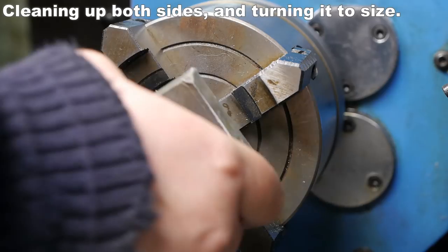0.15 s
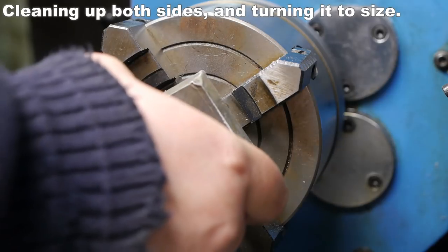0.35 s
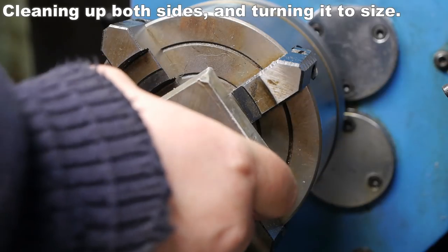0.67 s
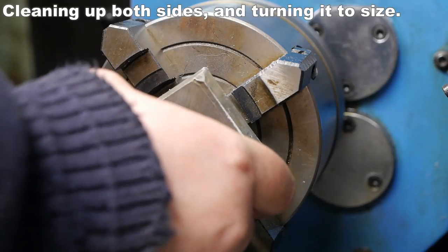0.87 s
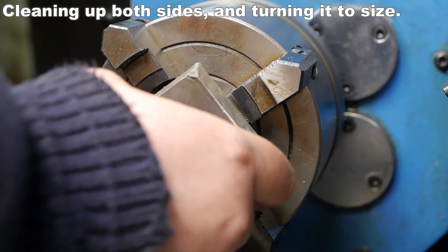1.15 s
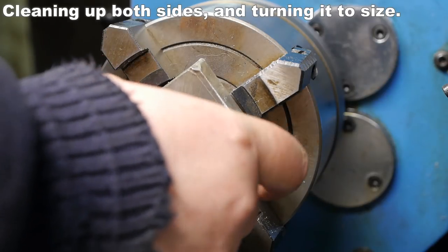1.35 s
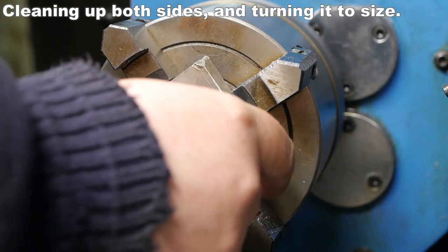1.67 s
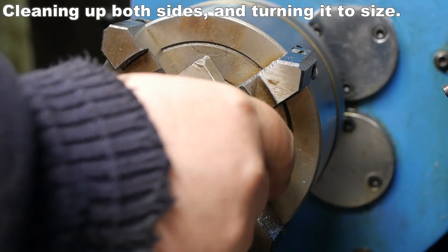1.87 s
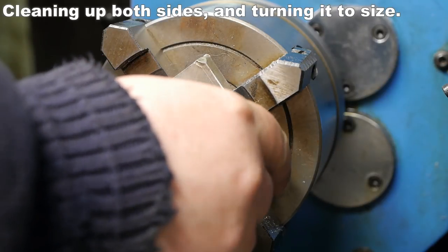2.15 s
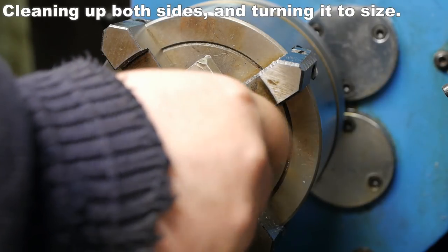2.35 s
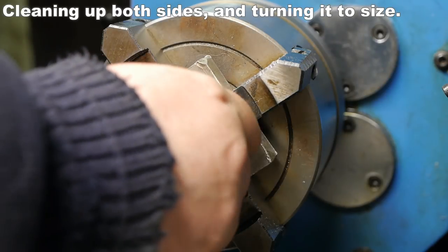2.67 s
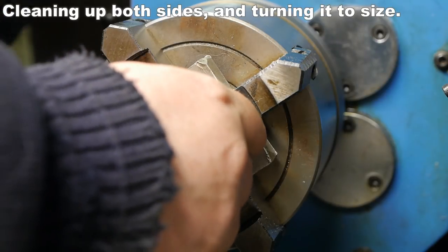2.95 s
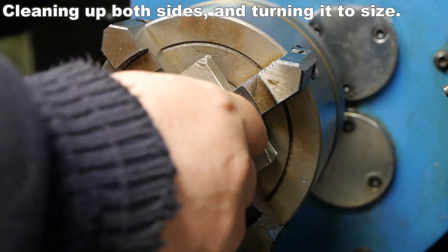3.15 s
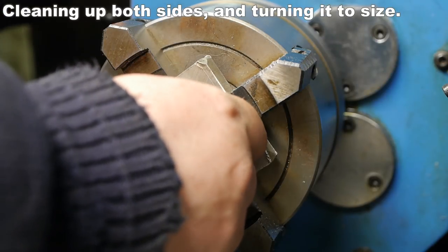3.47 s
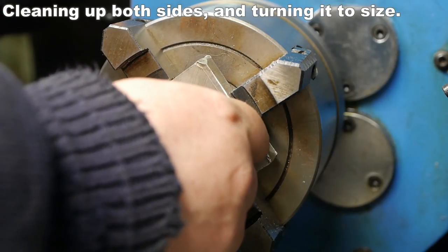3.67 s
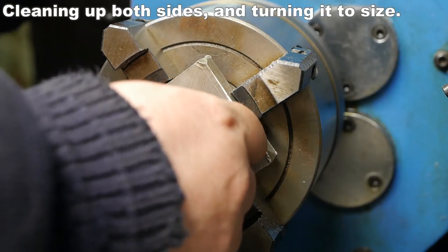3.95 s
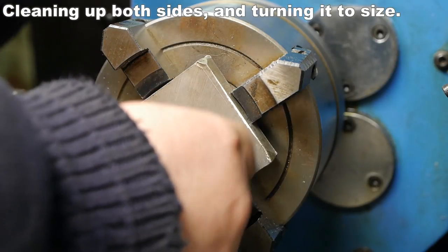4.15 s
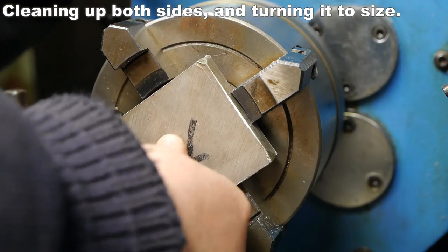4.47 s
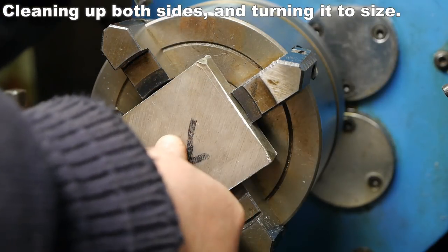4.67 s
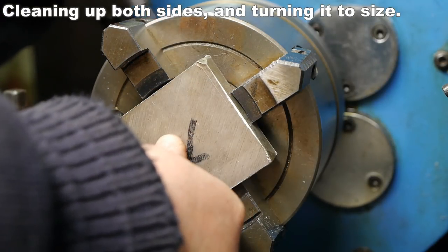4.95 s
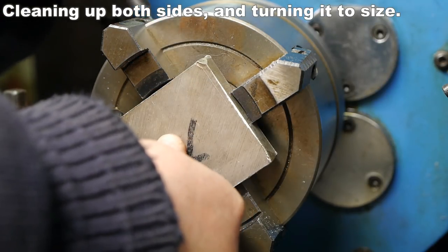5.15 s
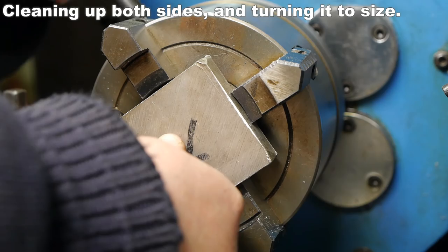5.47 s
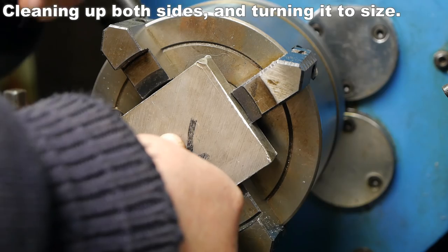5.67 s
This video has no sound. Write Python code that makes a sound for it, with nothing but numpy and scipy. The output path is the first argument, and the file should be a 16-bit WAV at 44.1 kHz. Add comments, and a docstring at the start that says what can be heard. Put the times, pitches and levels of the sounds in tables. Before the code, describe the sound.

In a quiet workshop, a metal block is fitted into a lathe chuck with dull booming knocks, short scrapes, small clinks and sharp final clacks.

```python
"""In a small, quiet workshop a hand seats a square aluminium block in the jaws of a lathe chuck.
Each knock on the steel jaws cracks (shaped noise), rings the block, then booms through chuck and bed
(decaying modes); loose parts rattle on. Sliding faces hiss, scrape and grind as dense random grains.
A steel key and the block clink briefly as a bank of high modes. Diffuse reflections answer the work,
and a low room rumble with faint hiss and mains hum lies below as banded noise and a sine."""
import sys
import numpy as np
from scipy import signal
from scipy.fft import rfft, irfft
from scipy.io import wavfile

SR = 44100
rng = np.random.default_rng(int(sys.argv[2]) if len(sys.argv) > 2 else 0)


def wav_out(sig):
    """Save sig, one row per channel (or a flat mono array), as 16-bit PCM at SR to the path in sys.argv[1]."""
    wavfile.write(sys.argv[1], SR, np.round(np.clip(np.atleast_2d(sig).T, -1, 1) * 32767).astype(np.int16))


N = 256662  # length [samples]

KNOCK_T = np.arange(int(.36 * SR)) / SR  # time from the start of a knock [s]
IMPULSE = KNOCK_T == 0
BED_LAG_S = 0.0066
SWELL = 1 - np.exp(-(KNOCK_T / BED_LAG_S) ** 3.24)  # heavy castings take a few cycles to get going


def knocks():
    """Impact excitation: an impulse for the castings, separate noise for the rattle, chatter for the block."""
    # knocks: (time [s], lathe bed [dB], chuck [dB], block [dB], contact crack [dB],
    #          favoured pitch of bed [Hz], favoured pitch of chuck [Hz])
    knock_list = [(0.265, -32.5, -61, -60, -49, 220, 695), (0.291, -47.5, -62, -53, -59, 190, 840),
                  (0.701, -40, -42, -60, -68, 470, 710), (0.936, -72, -83, -65, -72, 243, 960),
                  (1.09, -49, -52, -61, -72, 494, 890), (1.104, -49, -50, -52, -78, 570, 670),
                  (1.294, -16.5, -29, -29.5, -47, 440, 720), (1.391, -31.5, -45.5, -71, -78, 416, 750),
                  (1.501, -43, -52, -60, -66, 308, 730), (1.752, -21, -31, -47.5, -59, 453, 643),
                  (2.119, -31.5, -43, -56, -72, 510, 714), (2.143, -30, -33, -42.5, -59, 290, 664),
                  (2.17, -31, -43, -34, -58, 484, 750), (2.327, -22, -27.5, -33.5, -48, 448, 650),
                  (2.593, -79, -36.5, -51.5, -54, 408, 700), (2.838, -43.5, -42, -36.5, -30, 312, 630),
                  (3.097, -42.5, -65, -63, -74, 256, 626), (3.476, -49, -46.5, -31, -26.5, 202, 1260),
                  (3.505, -67, -41, -42, -39, 393, 1100), (3.524, -57, -69, -40.5, -48, 302, 1300),
                  (3.534, -47, -51, -36, -49, 204, 1250), (3.572, -38.5, -41.5, -30, -37.5, 498, 860),
                  (3.599, -33.5, -37, -36, -66, 490, 730), (3.742, -45.5, -59, -71, -70, 576, 820),
                  (3.83, -48, -52, -46, -28.5, 274, 750), (3.844, -47.5, -63, -44.5, -42, 510, 977),
                  (3.931, -64, -46.5, -33.5, -36.5, 507, 622), (3.936, -41.5, -45, -44, -35, 476, 1030),
                  (3.956, -44, -56, -51, -42, 467, 970), (3.978, -37.5, -37.5, -31, -39, 500, 880),
                  (4.656, -48, -80, -49, -54, 364, 716), (4.902, -53, -70, -57, -67, 353, 1120),
                  (4.931, -20, -36, -16.5, -22, 379, 690), (5.133, -19, -31.5, -24.5, -28.5, 341, 900),
                  (5.214, -38, -42, -34.5, -48, 258, 622), (5.242, -37.5, -43.5, -48, -51, 330, 880),
                  (5.377, -73, -76, -64, -50, 229, 633), (5.434, -19, -30, -26, -18.5, 383, 820),
                  (5.558, -15, -29.5, -25.5, -10, 374, 625)]
    out = np.zeros((2, N))
    for s, bed_db, chuck_db, block_db, crack_db, bed_hz, chuck_hz in knock_list:
        noises = rng.standard_normal((4, len(KNOCK_T)))
        add(out, s, castings(bed_db, chuck_db, bed_hz, chuck_hz))
        add(out, s, stand_shudder(bed_db))
        add(out, s, loose_parts(chuck_db, noises))
        add(out, s, block_on_jaws(block_db, crack_db, noises))
    return out


def castings(bed_db, chuck_db, bed_hz, chuck_hz):
    """Modal superposition: bed and chuck sum damped modes that build up with a lag after an impulse."""
    # modes of the lathe bed: (frequency [Hz], relative level [dB], t60 [s])
    bed_modes = [(182.4, -6, 0.47), (214, -6, 0.68), (240.3, -2, 0.2), (265.4, -2, 0.22), (292.9, -1, 0.27),
                 (316.2, 1.5, 0.12), (340, -7.5, 0.34), (379.9, -8.5, 0.39), (398.7, -1, 0.13),
                 (450, 3, 0.15), (479.5, 0.5, 0.13), (511.5, -4.5, 0.17), (520, 1.5, 0.17),
                 (585, -10.5, 0.29)]
    # modes of the chuck: (frequency [Hz], relative level [dB], t60 [s])
    chuck_modes = [(627, 2.5, 0.044), (711, -2, 0.095), (775, -2, 0.14), (840, -34.5, 0.36),
                   (844, -11, 0.17), (893, -6, 0.22), (1015, 1, 0.11), (1100, -14, 0.44), (1205, 7.5, 0.13),
                   (1360, 6, 0.1)]
    bed_span_oct, chuck_span_oct = 0.66, 0.49
    chuck_lag_s = 0.0032
    # the first swings of the bed stand out until the vibration has spread through it
    punch, punch_s = 0.61, 0.0047
    bed = ringing(bed_modes, IMPULSE, favour(bed_modes, bed_hz, bed_span_oct))
    bed = peak_one(SWELL * (1 + punch * np.exp(-KNOCK_T / punch_s)) * bed)
    chuck = ringing(chuck_modes, IMPULSE, favour(chuck_modes, chuck_hz, chuck_span_oct))
    chuck = peak_one((1 - np.exp(-KNOCK_T / chuck_lag_s)) * chuck)
    rumble_cut = signal.butter(4, 130, "high", fs=SR, output="sos")
    return signal.sosfilt(rumble_cut, from_db(bed_db) * bed + from_db(chuck_db) * chuck)


def stand_shudder(bed_db):
    """Low-order modes: the stand shudders below the bed with the same gradual onset."""
    # modes of the stand: (frequency [Hz], relative level [dB], t60 [s])
    stand_modes = [(70, -17, 0.38), (102.7, 5.5, 0.15), (153.5, 5.5, 0.23)]
    stand_db = -21  # against the bed
    return from_db(bed_db + stand_db) * SWELL * ringing(stand_modes, IMPULSE, count=1)


def loose_parts(chuck_db, noises):
    """Noise with exponential decay: loose parts rattle on after a knock."""
    # spectrum of the rattle: (frequency [Hz], relative level per Hz [dB])
    rattle_spectrum = [(600, 3.5), (1000, 14), (1500, -1), (2200, -33), (3500, -28), (6000, -43)]
    rattle_db, rattle_s = -5.5, 0.032  # level against the chuck, decay time
    _, left, right, loose = noises
    rattle = colour(loose + np.array([left, right]), rattle_spectrum)
    return from_db(chuck_db + rattle_db) * peak_one(SWELL * np.exp(-KNOCK_T / rattle_s) * rattle)


def block_on_jaws(block_db, crack_db, noises):
    """Contact force as source: a brief noisy chatter is heard directly and drives block and jaw modes."""
    # modes of the block: (frequency [Hz], relative level [dB], t60 [s])
    block_modes = [(1900, 0, .03), (2200, 0, .035), (2520, -2, .03), (3000, -4, .03), (3400, 0, .04),
                   (3650, -4, .03), (4400, -5, .03), (4850, -5, .03)]
    # modes of the jaws: (frequency [Hz], relative level [dB], t60 [s])
    jaw_modes = [(6150, -2, .05), (7350, 0, .07), (10200, -8, .03), (11500, -8, .03)]
    # spectrum of the block's clack and clatter: (frequency [Hz], relative level per Hz [dB])
    clack_spectrum = [(700, -3), (1300, -2), (2000, 10.5), (3000, 1.5), (4500, -8), (7000, -25)]
    # spectrum of the contact crack: (frequency [Hz], relative level per Hz [dB])
    crack_spectrum = [(2500, -16), (4500, -9.5), (6000, -2.5), (8000, -2), (9500, -7), (12000, -13.5),
                      (13500, -38), (16000, -33)]
    contact_s, pan_db = 0.004, -1.9  # decay time of the chatter; left minus right
    clatter_db, clatter_s = -9, 0.011  # level against the clack, decay time
    ring_at_40_db, ring_damping = -5.5, 0.36  # ring at a -40 dB contact; dB lost per dB of a firmer one

    shared, left, right, loose = noises
    touch = np.exp(-KNOCK_T / contact_s) * (1 - np.exp(-3 * KNOCK_T / contact_s))
    force = shared * touch
    clack = peak_one(touch * colour(shared + 0.42 * np.array([left, right]), clack_spectrum))
    crack = peak_one(touch * colour(shared + 0.73 * np.array([left, right]), crack_spectrum))
    clatter = colour(2.4 * loose + np.array([right, left]), clack_spectrum)
    clatter = peak_one(SWELL * np.exp(-KNOCK_T / clatter_s) * clatter)

    ring_gain = from_db(ring_at_40_db - ring_damping * (max(block_db, crack_db) + 40))
    block_ring = ring_gain * ringing(block_modes, force)
    jaw_ring = ring_gain * ringing(jaw_modes, force, cluster=0.0275)
    block = from_db(block_db) * (clack + from_db(clatter_db) * clatter + block_ring)
    jaws = from_db(crack_db) * (crack + jaw_ring)
    return (block + jaws) * from_db(pan_db / 2 * np.array([[1], [-1]]))


def clinks():
    """Free vibration: an impulse sets off the high ringing of key and block, each mode decaying alone."""
    # clinks of key and block: (time [s], peak level before panning [dB], favoured pitch [Hz])
    clink_list = [(3.479, -31, 8000), (3.507, -41, 1600), (3.524, -32.5, 2400)]
    # high ringing of key and block: (frequency [Hz], relative level [dB], t60 [s])
    clink_modes = [(1410, 5, .09), (2120, -2, .06), (2510, 4, 0.079), (3590, 1.5, .08), (4430, 0, 0.082),
                   (5840, -5, .1), (6760, 1.5, 0.17), (10050, -2, 0.3), (10940, -21, .1), (13240, -11, .14),
                   (14270, -18, .15)]
    span_oct = 1.55
    out = np.zeros((2, N))
    for s, db, hz in clink_list:
        weights_db = favour(clink_modes, hz, span_oct)
        clink = ringing(clink_modes, IMPULSE, weights_db, cluster=.002, spread_db=1.5, count=1)
        add(out, s, from_db(db) * clink * from_db([[-2], [2]]))  # to the right
    return out


def rubs(grains_per_s=9000, size_db=2.0):
    """Friction noise: dense uneven micro-contacts of sliding faces, heard in air, block and bed."""
    # rubbing strokes: (time at full pressure [s], hold [s], hiss [dB], scrape in the block [dB],
    #                   whisper of light rubbing [dB])
    strokes = [(0.175, 0.012, -61, -65, -71), (0.304, .14, -44, -44.5, -73),
               (1.856, 0.018, -63.5, -84, -70.5), (1.98, .06, -63.5, -67, -73), (2.2, 0.44, -77, -73, -73),
               (2.684, 0.083, -63, -60.5, -78), (2.867, 0.0079, -54.5, -55.5, -63),
               (3.242, 0.006, -55, -54.5, -59), (3.356, 0.16, -67, -72, -74),
               (3.579, 0.019, -64, -53.5, -72), (4.263, 0.023, -58.5, -72, -77),
               (4.328, 0.039, -58, -66.5, -68), (4.457, 0.026, -56.5, -64.5, -67),
               (4.58, .02, -57, -60.5, -60), (4.743, 0.0084, -64.5, -66, -64.5),
               (4.814, 0.068, -90, -90, -74), (5.194, 0.026, -65, -58.5, -73),
               (5.435, 0.003, -57, -52, -72), (5.69, .04, -61.5, -70, -87)]
    # low grind in the bed while the hand works the block: (time [s], level [dB])
    grind_level = [(0, -57.5), (.245, -56), (.27, -46.5), (.44, -47), (.55, -70), (1.45, -74),
                   (1.68, -50.5), (1.9, -76), (2.2, -64.5), (2.7, -53.5), (2.86, -58), (2.95, -61.5),
                   (3.14, -54), (3.45, -63), (4.2, -69), (4.35, -58.5), (4.9, -58), (5.4, -66.5),
                   (5.43, -39.5), (5.6, -57), (5.82, -76)]
    # spectrum of the hiss: (frequency [Hz], relative level per Hz [dB])
    hiss_spectrum = [(1760, -47), (3000, -15.5), (4730, -9.5), (8110, -9.5), (9070, -6.5), (10600, -12),
                     (14700, -25.5), (16000, -41)]
    # spectrum of the scrape: (frequency [Hz], relative level per Hz [dB])
    scrape_spectrum = [(800, -12), (1450, -13), (1560, 0), (1950, 0), (2080, -8), (3100, -5), (4500, -12),
                       (6000, -20)]
    # spectrum of the grind: (frequency [Hz], relative level per Hz [dB])
    grind_spectrum = [(90, -7), (200, 1.5), (400, 7.5), (650, -3), (1000, -12), (1500, -17)]
    # faint bands of light rubbing: (centre [Hz], width [Hz], relative level [dB])
    whisper_bands = [(3320, 210, 25), (4980, 140, -26), (5600, 210, 1), (7700, 280, -18), (10100, 680, -18)]
    rise_db_per_s, fall_db_per_s = 386, 185

    t, out = np.arange(N) / SR, np.zeros((2, N))
    stroke_gains = np.zeros((3, N))
    for s, hold, *levels_db in strokes:
        below_db = rise_db_per_s * np.maximum(s - t, 0) + fall_db_per_s * np.maximum(t - s - hold, 0)
        stroke_gains += from_db(np.array(levels_db)[:, None] - below_db)
    hiss, scrape, whisper = stroke_gains
    grind = from_db(np.interp(t, *np.transpose(grind_level)))

    # (gain, spectrum, how far left and right differ)
    layers = ((hiss, hiss_spectrum, 1.0), (scrape, scrape_spectrum, 0.71),
              (grind, grind_spectrum, 0.027), (whisper, None, 1.0))
    for gain, spectrum, apart in layers:
        struck = rng.random(N) < grains_per_s / SR
        grains = struck * from_db(size_db * rng.exponential(1, N)) * rng.choice([-1, 1], N)
        grains = rms_one(grains) + apart * rng.standard_normal((2, N))
        if spectrum:
            sound = colour(grains, spectrum)
        else:
            sound = np.zeros((2, N))
            for hz, width_hz, db in whisper_bands:
                b, a = signal.iirpeak(hz, hz / width_hz, fs=SR)
                sound += from_db(db) * signal.lfilter(b, a, grains)
        out += gain * from_db(1.2 * drift(41)) * rms_one(sound)
    return out


def workshop(x):
    """Diffuse-field reverberation: noise that dies band by band, starting after the first wall."""
    # decay of the room: (frequency [Hz], t60 [s])
    decay_times = [(100, 0.91), (300, 0.47), (1000, 0.25), (4000, 0.26), (12000, 0.25)]
    t = np.arange(int(.7 * SR)) / SR
    tail = sum(pair * from_db(-60 * t / at_hz(decay_times, hz)) for hz, pair in bands(len(t)))
    tail *= np.clip((t - .004) / 0.0025, 0, 1)
    tail /= np.sqrt(np.sum(tail ** 2) / 2)  # unit energy per channel on average
    return signal.fftconvolve(x[None], tail, axes=1)[:, :N]


def room_noise():
    """Broadband noise: distant rumble and faint hiss, slightly patchy, with a wavering mains hum."""
    # spectrum of the room noise: (frequency [Hz], relative level per Hz [dB])
    noise_spectrum = [(15, -46), (25, -17), (229, 0), (344, -16), (416, -6), (677, -17.5), (911, -14.5),
                      (1330, -20), (8140, -27), (9070, -20), (10100, -28), (14800, -31.5), (16000, -47)]
    # patchiness of the room noise: (frequency [Hz], spread of level [dB])
    patchiness = [(100, 2.5), (600, 2.5), (2000, 1.2), (16000, .8)]
    noise_db, hum_db, hum_hz = -55.5, -70.5, 100  # rms of the noise; mean level and pitch of mains hum
    together = drift(0.17)
    noise = np.zeros((2, N))
    for hz, pair in bands(N):
        wander_db = 1.1 * together + at_hz(patchiness, hz) * drift(9.8)
        noise += from_db(at_hz(noise_spectrum, hz) + wander_db) * pair
    hum = from_db(1.4 * drift(4.6)) * np.sin(2 * np.pi * hum_hz * np.arange(N) / SR)
    return from_db(noise_db) * rms_one(noise) + from_db(hum_db) * hum


def ringing(modes, force, favour_db=0, cluster=0.03424, spread_db=1.0, count=3):
    """Convolution of a contact force with the impulse response of clustered close modes; peak 1."""
    # cluster: spread of the close modes as a share of their pitch; count: modes in each cluster
    hz, level_db, t60 = np.transpose(modes)[:, :, None]
    t = np.arange(len(force)) / SR
    response = 0
    for shift, weight, sign in rng.standard_normal((count, 3, *hz.shape)):
        decay_db = level_db + favour_db + spread_db * weight - 60 * t / t60
        level = from_db(decay_db) * np.sign(sign)
        swing = np.sin(2 * np.pi * hz * (1 + cluster * shift) * t)
        response = response + np.sum(level * swing, axis=0)
    return peak_one(signal.fftconvolve(response, force)[:len(force)])


def favour(modes, centre_hz, span_oct):
    """Modal participation: the place struck favours the modes near one pitch (dB)."""
    return -10 * (np.log2(np.array(modes)[:, :1] / centre_hz) / span_oct) ** 2


def colour(x, spectrum):
    """Spectral shaping of noise or grains, silent outside the table's range; rms 1."""
    size = x.shape[-1]
    hz = np.maximum(np.fft.rfftfreq(size, 1 / SR), 1)
    outside = (hz < spectrum[0][0]) | (hz > spectrum[-1][0])
    return rms_one(irfft(rfft(x) * from_db(at_hz(spectrum, hz)) * ~outside, size))


def bands(size):
    """Spatial coherence: yields each band's centre and stereo noise of set left-right likeness."""
    # (frequency [Hz], left-right correlation [1])
    likeness = [(25, 0.9), (60, 0.92), (125, 0.95), (300, 1), (500, 0.91), (1200, 0.077), (5000, 0.067),
                (12000, 0.01)]
    edges = 22 * 2 ** np.arange(0, 9.7, .4)  # Hz, 0.4 octave apart
    white = rng.standard_normal((2, 2, size))
    for k, (low, high) in enumerate(zip(edges, edges[1:])):
        band = signal.butter(2, [low, high], "band", fs=SR, output="sos")
        mid, side = signal.sosfilt(band, white[k % 2])  # neighbouring bands use separate noise
        hz = np.sqrt(low * high)
        alike = np.clip(at_hz(likeness, hz), -1, 1)
        yield hz, np.sqrt(1 + alike) * mid + np.sqrt(1 - alike) * side * [[1], [-1]]


def drift(rate):
    """Low-pass filtered random fluctuation of rms 1, about rate changes a second."""
    step = 40  # samples between computed points
    r = np.exp(-2 * step * np.pi * rate / SR)
    white = rng.standard_normal(N // step + 2002)
    slow = signal.lfilter([1], [1, -2 * r, r * r], white)[2000:]  # past the filter's start
    return np.interp(np.arange(N) / step, np.arange(len(slow)), rms_one(slow))


def at_hz(points, hz):
    """Logarithmic frequency scale: read a (frequency [Hz], value) table at hz."""
    return np.interp(np.log(hz), np.log(np.array(points)[:, 0]), np.array(points)[:, 1])


def from_db(db):
    """Level to amplitude ratio: dB to gain."""
    return 10 ** (np.asarray(db) / 20)


def rms_one(x):
    """Power normalisation: scale to rms 1."""
    return x / np.sqrt(np.mean(x ** 2) + 1e-20)


def peak_one(x):
    """Amplitude normalisation: scale to peak 1."""
    return x / np.abs(x).max()


def add(out, s, sound):
    """Linear superposition: mix a sound in at s seconds."""
    at = int(s * SR)
    out[:, at:at + sound.shape[-1]] += sound[..., :N - at]


def scene():
    """Superposition of direct sound from the chuck, its reflections and the room noise."""
    reflections_db = -10.5
    near = knocks() + clinks() + rubs() * from_db([[-.8], [.8]])
    return near + from_db(reflections_db) * workshop(near.mean(0)) + room_noise()


def record(dry):
    """Receiver response: the microphone has a narrow dip in the treble; the top is cut."""
    dip_hz, dip_width_hz, dip_depth = 9005, 1090, 0.76  # depth: share of the amplitude removed
    cutoff_hz = 15750
    b, a = signal.iirpeak(dip_hz, dip_hz / dip_width_hz, fs=SR)
    dipped = dry - dip_depth * signal.lfilter(b, a, dry)
    return signal.sosfilt(signal.ellip(12, .5, 70, cutoff_hz, fs=SR, output="sos"), dipped)


dry = scene()
out = record(dry)
wav_out(out)
```